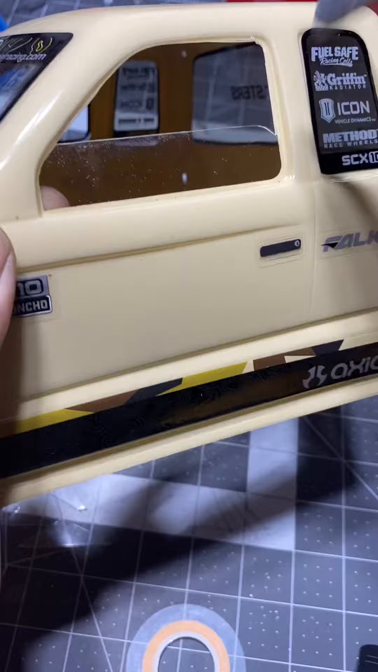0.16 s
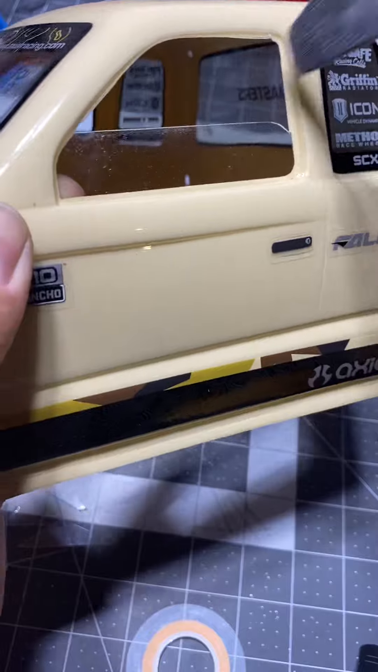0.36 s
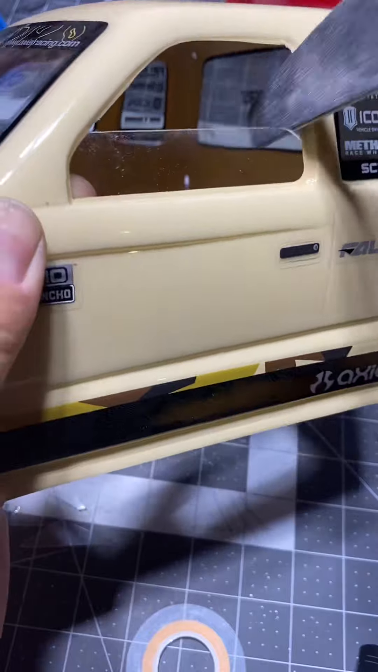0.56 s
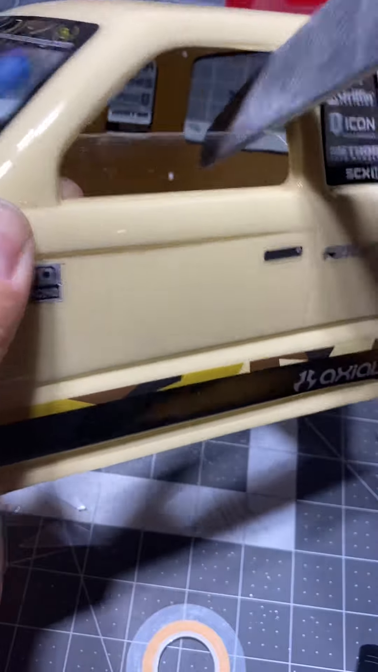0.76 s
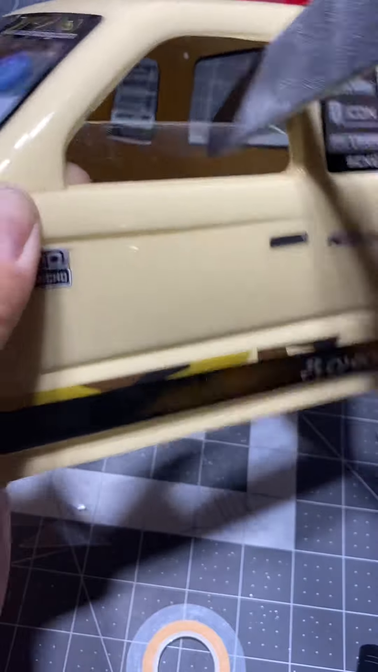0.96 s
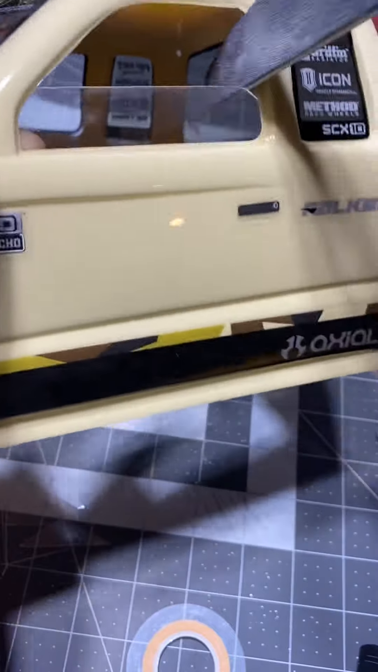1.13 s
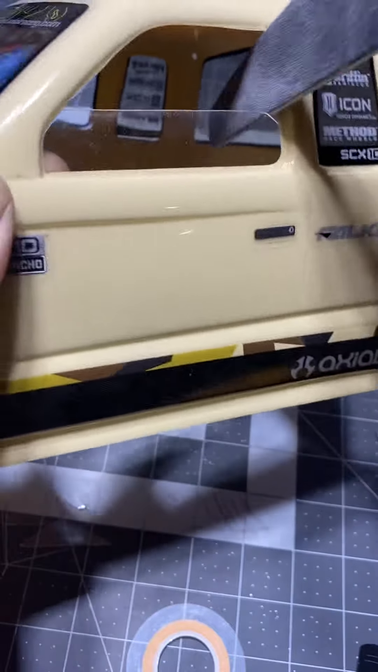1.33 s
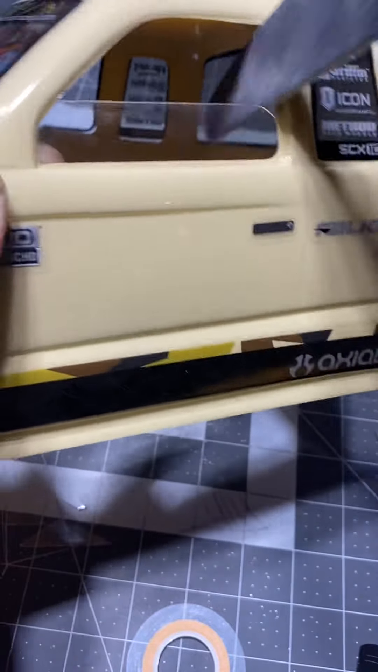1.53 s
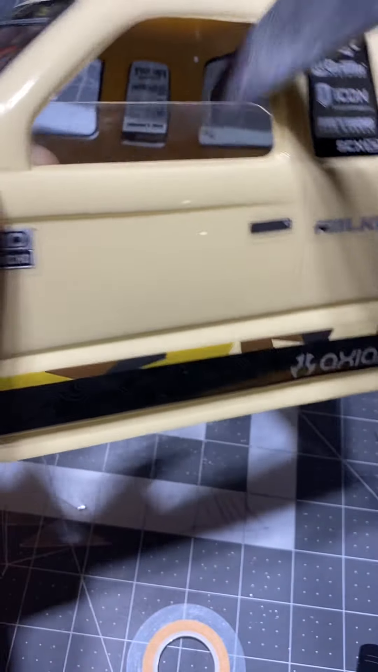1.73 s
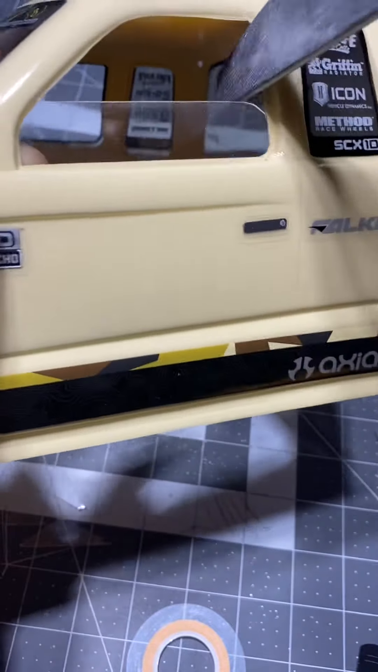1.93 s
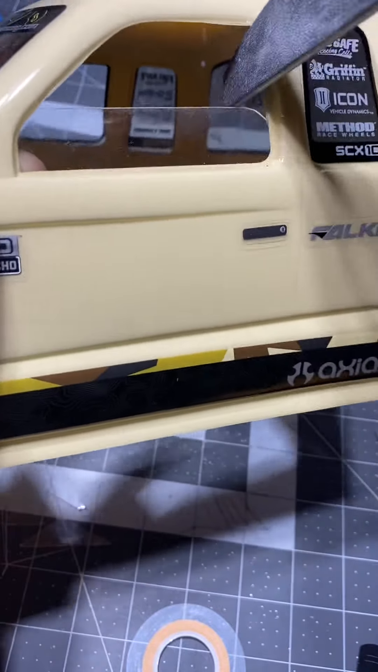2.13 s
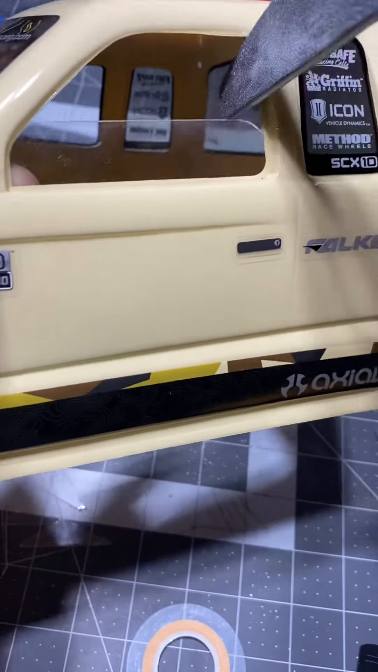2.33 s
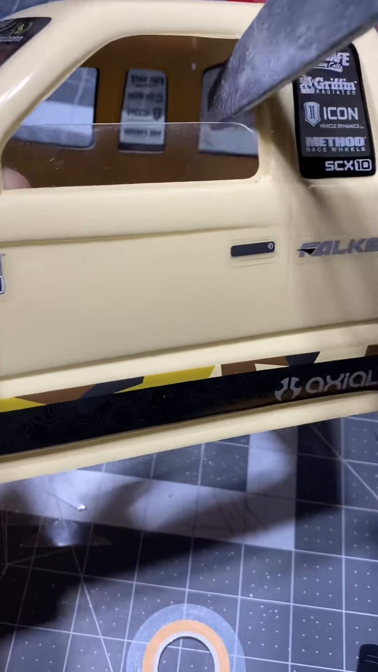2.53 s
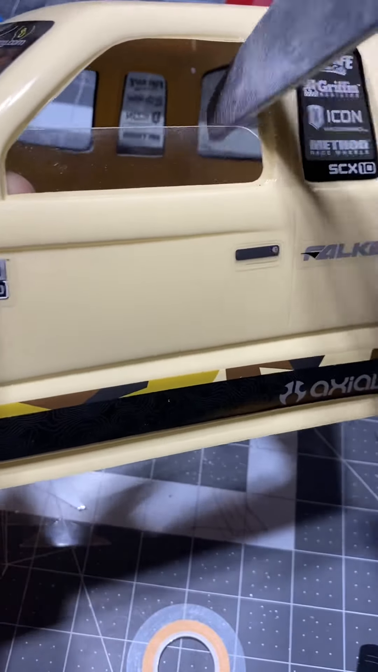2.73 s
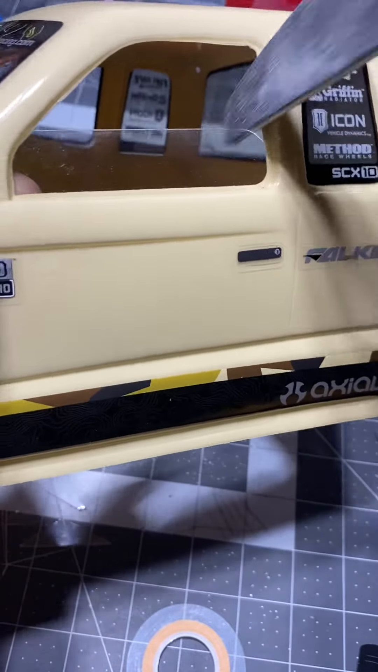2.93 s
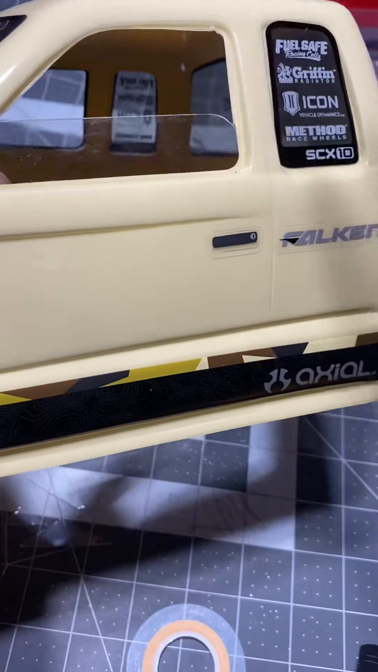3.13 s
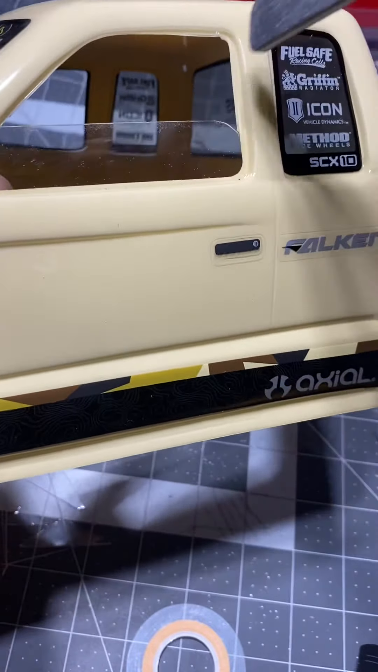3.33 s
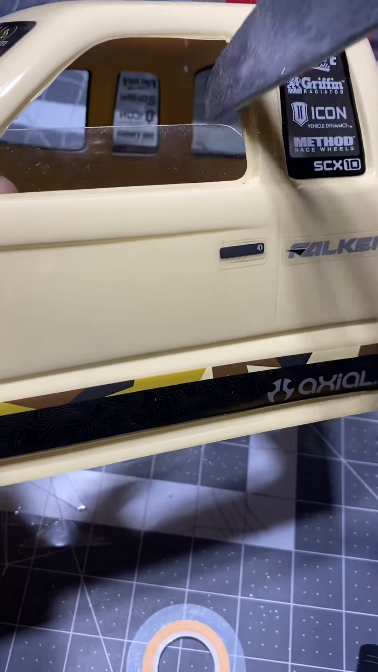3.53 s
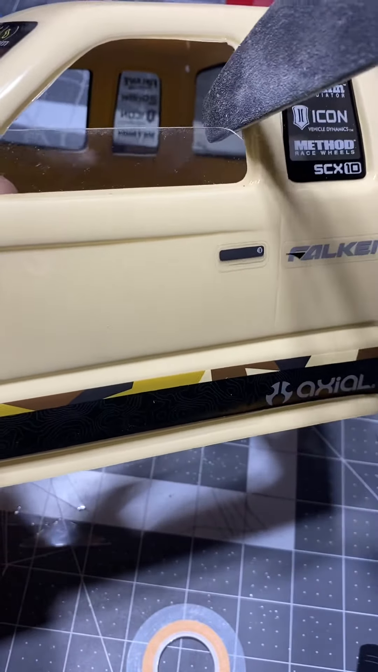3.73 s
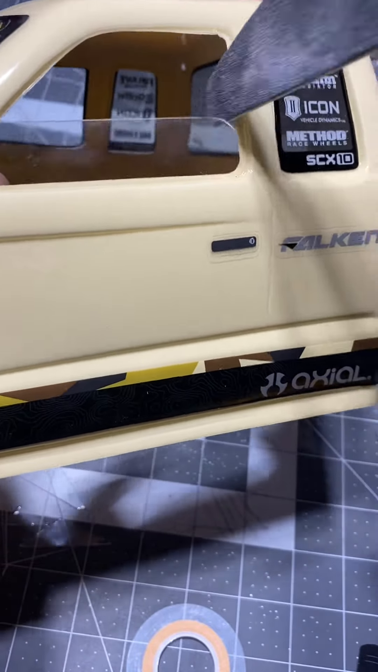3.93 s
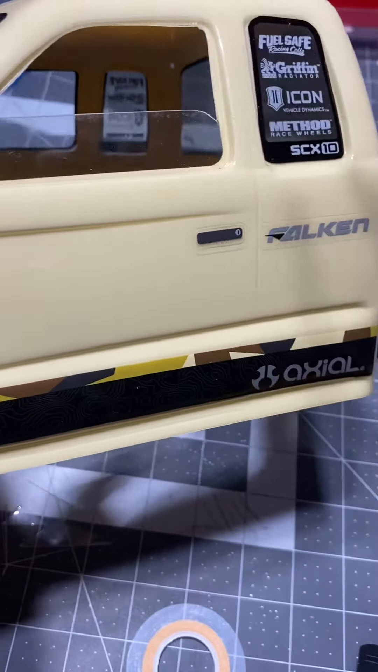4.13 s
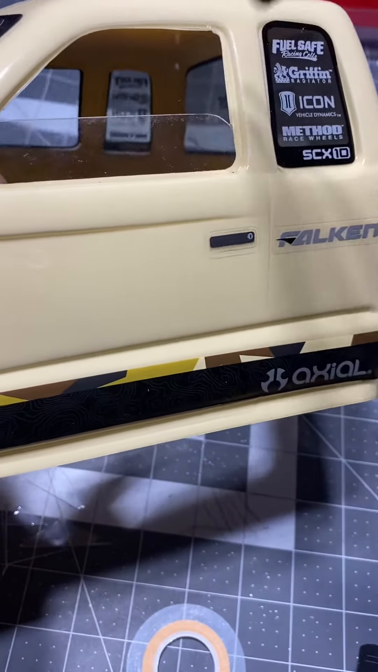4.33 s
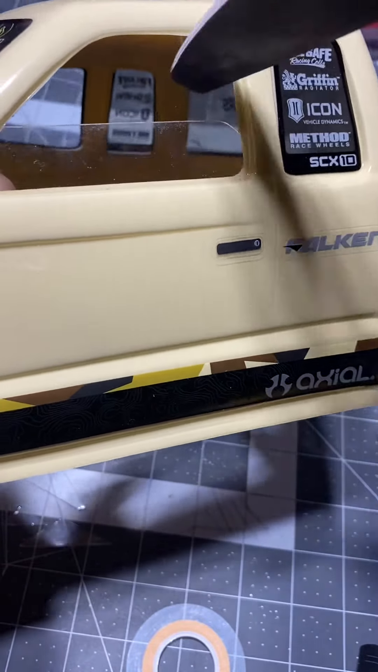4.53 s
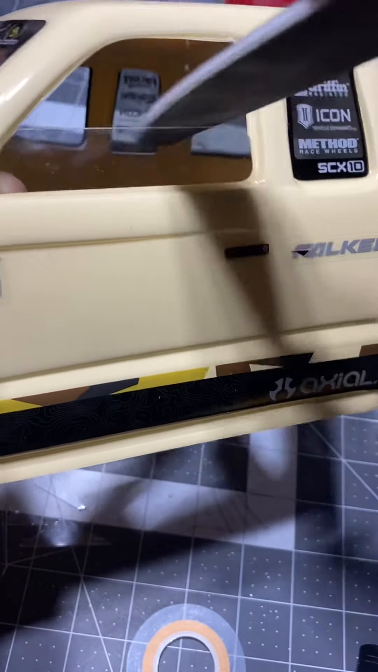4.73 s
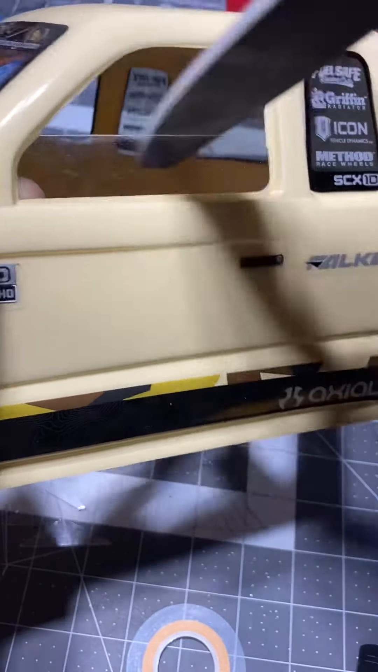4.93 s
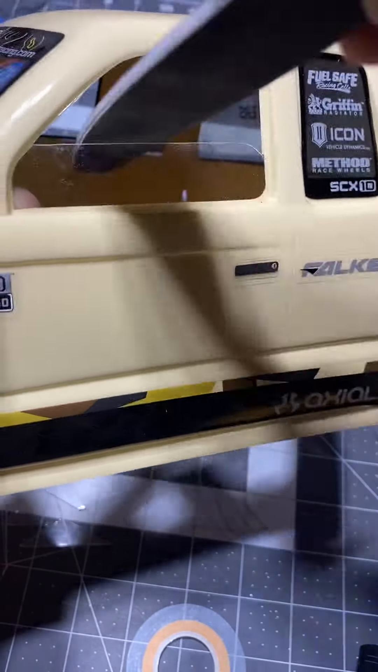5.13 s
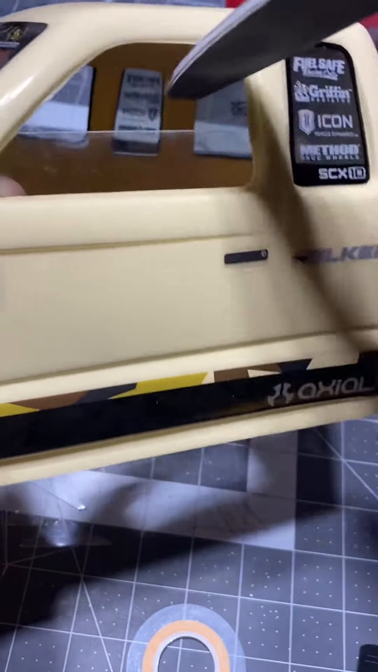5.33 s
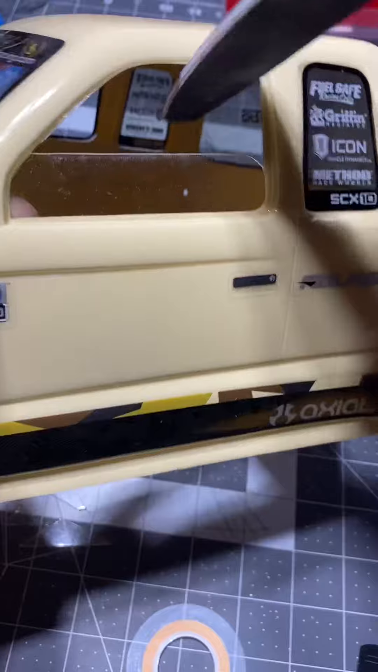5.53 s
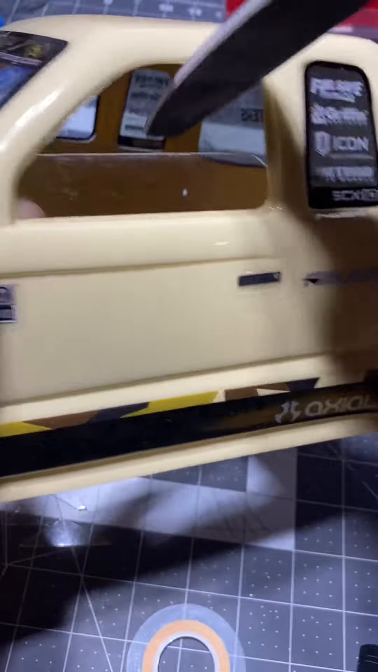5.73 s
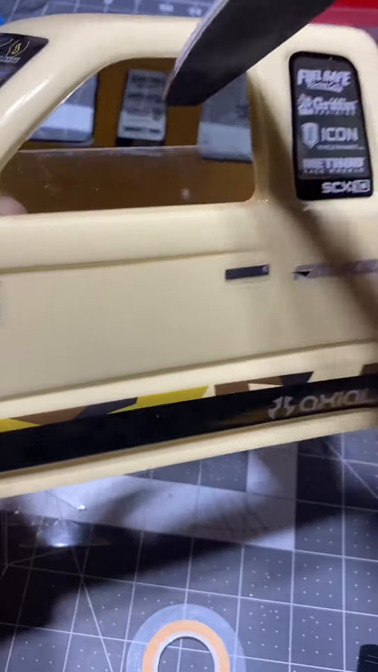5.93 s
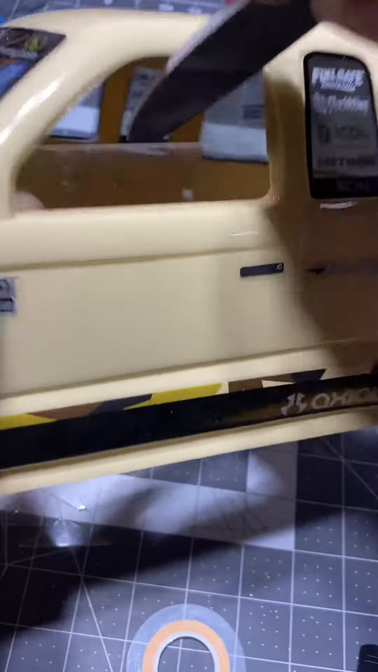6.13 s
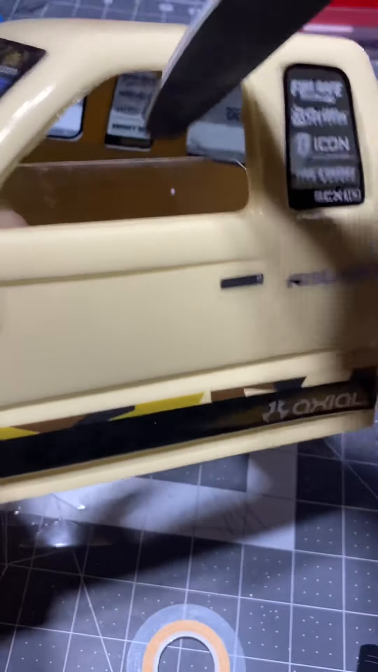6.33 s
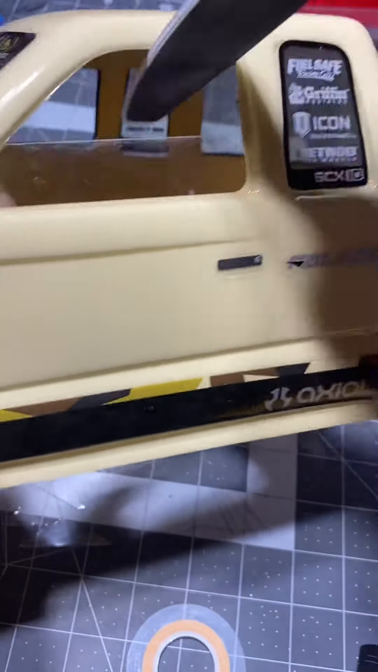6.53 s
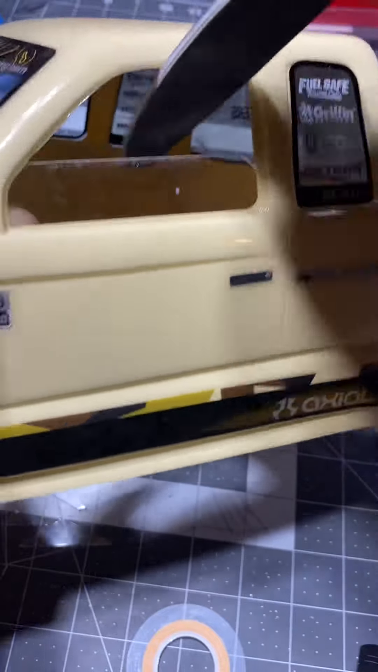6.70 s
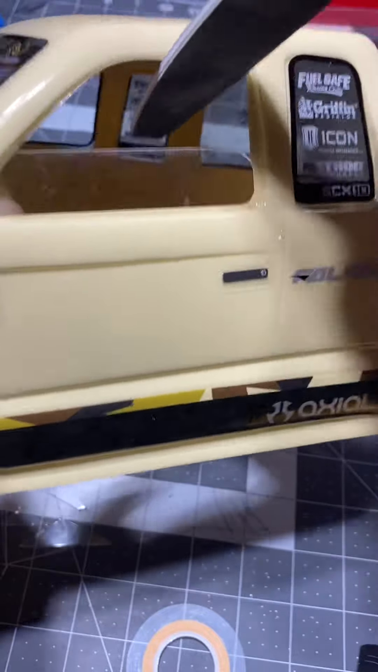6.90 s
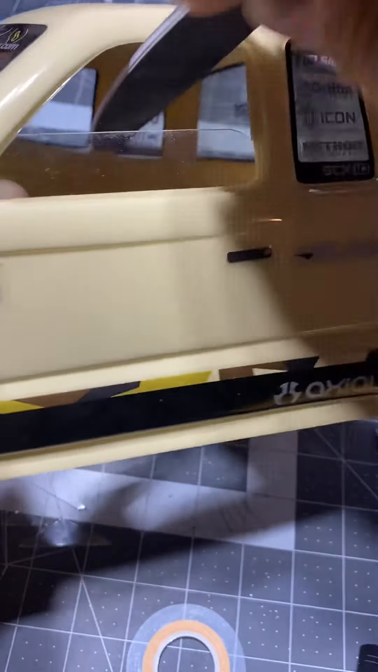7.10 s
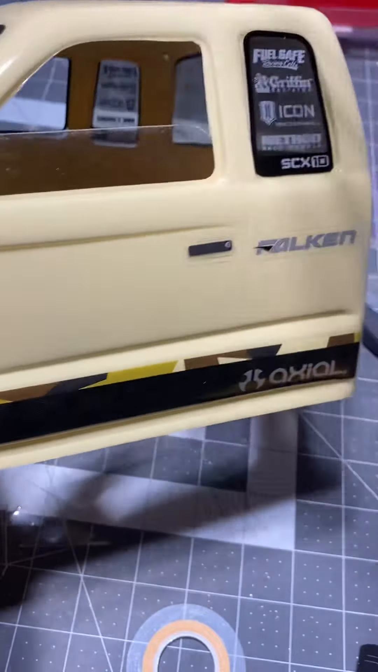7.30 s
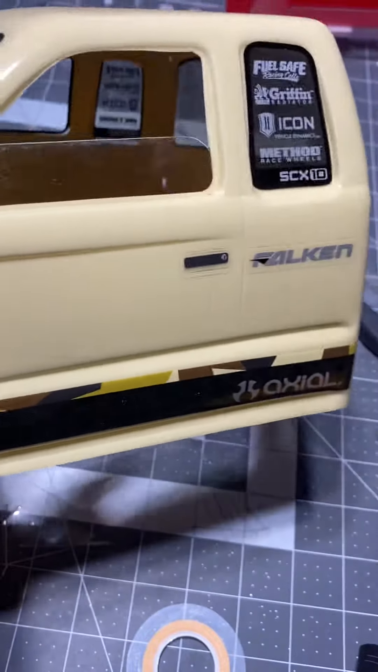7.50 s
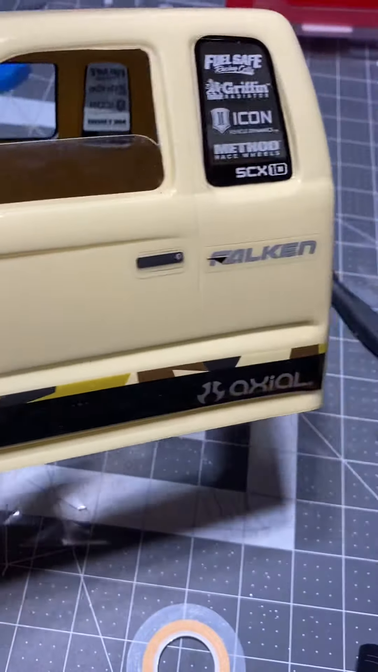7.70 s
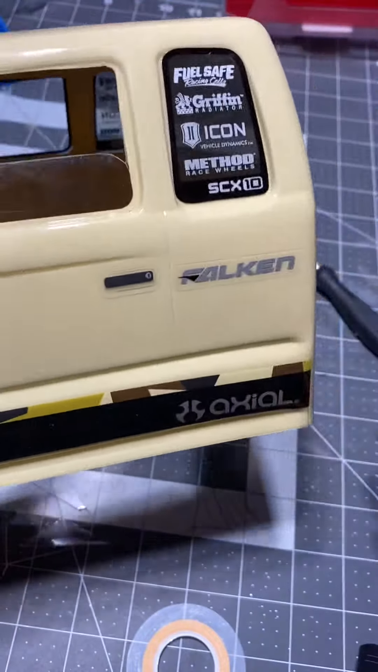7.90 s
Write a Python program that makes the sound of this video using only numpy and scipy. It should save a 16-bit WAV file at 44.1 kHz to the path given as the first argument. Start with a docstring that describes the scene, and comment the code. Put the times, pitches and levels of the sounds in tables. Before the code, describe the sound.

A nail file rasps in quick strokes on the edge of a hollow plastic shell, pauses, then scrubs broadly back and forth in a small room.

```python
"""Small quiet room, hollow toy car body held near a microphone with two closely spaced ports.
A nail file rasps first at the corner of a plastic window, biting hard on the strongest strokes, then, after a lull,
along the straight edge: light scrubs, then broad strokes back and forth. At the end a hand shifts the body.
Noisy grains of grit pluck the edge and drive the shell's resonances; snaps, faint rustles, knocks, chatter and
thuds join them, and a short room tail and faint room tone lie behind."""
import sys
import numpy as np
from scipy import signal
from scipy.fft import rfft, irfft, next_fast_len
from scipy.io import wavfile
from scipy.ndimage import map_coordinates

SR = 44100
rng = np.random.default_rng(int(sys.argv[2]) if len(sys.argv) > 2 else 0)


def dump_mix(stems):
    """Bounce the given channels to the path in sys.argv[1] as a 16-bit WAV at rate SR."""
    frames = np.atleast_2d(stems).T  # one column per channel
    limited = np.clip(frames, -1, 1)  # hard clip at full scale
    pcm = np.round(limited * 32767).astype(np.int16)
    wavfile.write(sys.argv[1], SR, pcm)


N = 351035
TIME = np.arange(N) / SR
SIZE = 8192  # samples in a shell spectrum, knots in a random curve
HZ = np.fft.rfftfreq(SIZE, 1 / SR)
EDGE_FROM = 4.2  # s, the file moves from the corner to the straight edge

# file strokes: (start [s], end [s], relative level [dB], way of moving)
STROKES = [(0, 0.089, -26, "dig"), (.497, 0.552, -34, "scrub"), (0.534, 0.676, -19, "pull"),
           (.713, 0.835, -20, "push"), (.848, 0.937, -20, "lean"), (1.012, 1.17, -16.5, "push"),
           (1.2, 1.305, -22, "back"), (1.311, 1.441, -13.5, "dig"), (1.439, 1.558, -23, "back"),
           (1.563, 1.677, -15, "dig"), (1.674, 1.785, -27, "back"), (1.785, 1.892, -12, "dig"),
           (1.89, 2.012, -27, "back"), (2.016, 2.12, -16, "dig"), (2.131, 2.233, -27, "back"),
           (2.239, 2.337, -13.5, "dig"), (2.34, 2.449, -26, "back"), (2.45, 2.542, -16, "dig"),
           (2.552, 2.66, -28.5, "back"), (2.662, 2.756, -15.5, "dig"), (2.761, 2.854, -26.5, "back"),
           (2.861, 2.981, -11, "dig"), (3.5, 3.598, -32.5, "scrub"), (3.608, 3.701, -15, "back"),
           (3.716, 3.815, -16.5, "back"), (3.832, 3.956, -14.5, "scrub"), (4.516, 4.615, -35.5, "scrub"),
           (4.666, 4.729, -33.5, "scrub"), (4.729, 4.809, -32, "scrub"), (4.877, 4.968, -28.5, "scrub"),
           (5.02, 5.127, -31, "dig"), (5.127, 5.197, -24.5, "scrub"), (5.333, 5.452, -37, "push"),
           (5.469, 5.607, -20, "push"), (5.618, 5.776, -22, "pull"), (5.774, 5.943, -15.5, "push"),
           (5.937, 6.102, -18, "pull"), (6.109, 6.258, -12.5, "push"), (6.262, 6.428, -18, "pull"),
           (6.43, 6.593, -17, "push"), (6.587, 6.741, -21, "pull"), (6.742, 6.889, -22.5, "push"),
           (6.897, 7.062, -21.5, "pull"), (7.08, 7.254, -13, "lean")]
# the file catches on the edge: (time [s], length [s], relative level [dB])
BITES = [(1.066, 0.019, -17), (1.32, .014, -6.5), (1.566, 0.021, -9.5), (1.789, .019, -10),
         (2.015, 0.022, -10), (2.243, 0.017, -13.5), (2.458, .021, -10), (2.666, .012, -14),
         (2.867, 0.016, -12), (2.893, .01, -9), (5.871, .014, -14)]


def amp(db):
    """Decibels to gain."""
    return 10 ** (np.asarray(db) / 20)


def unit(x):
    """x at rms 1."""
    return x / np.sqrt(np.mean(x ** 2) + 1e-20)


def along(points, hz):
    """(Hz, value) points read on a log frequency axis."""
    f, v = np.transpose(points)
    return np.interp(np.log(hz + 1), np.log(f + 1), v)


def wobble(x):
    """A smooth random curve with one knot per unit of x."""
    return map_coordinates(rng.standard_normal(SIZE), [x], mode="wrap")


def filtered(x, response):
    """x times a complex response of frequency."""
    m = next_fast_len(N + SR // 2)
    spectrum = rfft(x, m) * response(np.fft.rfftfreq(m, 1 / SR))
    return irfft(spectrum, m)[..., :N]


def noise(spectrum):
    """Noise of rms 1 with the given colour."""
    return unit(filtered(rng.standard_normal(N), lambda hz: amp(along(spectrum, hz))))


def add(track, s, sound):
    """Mix a sound into the track at time s."""
    part = track[:, max(round(s * SR), 0):][:, :sound.shape[-1]]
    part += sound[..., :part.shape[1]]


def unsteady_ring(t, phase, knots_per_s):
    """A resonance driven by noise: a tone of rms 1 whose two quadratures wander at random."""
    sine_part = wobble(t * knots_per_s) * np.sin(phase)
    cosine_part = wobble(t * knots_per_s) * np.cos(phase)
    return unit(sine_part + cosine_part)


def room_tone(shared_db=-65, own_db=-80):
    """The quiet room: steady coloured noise common to both ports, with a fainter one of each port's own."""
    # colour of the quiet: (frequency [Hz], relative level per Hz [dB])
    quiet = [(25, -22), (50, -5), (75, 0.5), (150, 4.5), (210, -9), (380, -22.5), (550, -20), (900, -37),
             (4000, -40), (15000, -47)]
    return amp(shared_db) * noise(quiet) + amp(own_db) * np.array([noise(quiet), noise(quiet)])


def room(x, wet_db=-16, apart=0.3, dull_hz=6000):
    """Reflections as a short, dull tail of decaying noise, partly different at the two ports."""
    # the room's decay: (frequency [Hz], t60 [s])
    decay = [(150, 0.51), (400, .32), (1000, 0.25), (3000, 0.25), (8000, 0.36), (15000, 0.32)]
    hz, t, z = signal.stft(rng.standard_normal((3, SR // 2)), SR, nperseg=256)
    fading = z * amp(-60 * t / along(decay, hz)[:, None])
    tails = signal.istft(fading, SR, nperseg=256)[1]
    # the tail sets in 5 ms after the direct sound
    tail = np.pad(tails[:2] * apart + tails[2], ((0, 0), (SR // 200, 0)))
    wet = signal.fftconvolve(x, tail / np.linalg.norm(tail[0]), axes=1)[:, :N]
    return amp(wet_db) * filtered(wet, lambda f: 1 / (1 + (f / dull_hz) ** 4))


def hand():
    """Fingers rub over the plastic as the body is moved: coloured noise of fluttering level."""
    # the hand slides on the shell: (time [s], level before the flutter [dB])
    slide = [(7.755, -100), (7.78, -51), (7.83, -36.5), (7.88, -43), (7.96, -64.5)]
    # colour of fingers on plastic: (frequency [Hz], relative level per Hz [dB])
    skin = [(30, -24.5), (75, -6.5), (140, 1), (310, -0.5), (600, -19.5), (1000, -27.5), (1800, -26),
            (2800, -43.5), (4800, -37.5), (9000, -40), (15000, -44)]
    level_db = np.interp(TIME, *np.transpose(slide)) + 3.0 * wobble(TIME * 70)
    return amp(level_db) * noise(skin)


def bumps(attack=.0007):
    """Soft blows flex a panel, which the hand damps at once: short decaying sines."""
    # dull knocks on the shell: (time [s], level before decay and attack [dB], pitch [Hz], t60 [s])
    knocks = [(.634, -10, 622, .044), (.655, -20.5, 345.5, .18), (.957, -21, 422, .1),
              (1.012, -26.5, 230.8, .12), (4.594, -17.5, 517, .058), (4.9535, -3, 533, .038),
              (4.9602, -8.5, 642, .028), (4.966, -23.5, 330, .13), (6.17, -30.5, 99.9, .09),
              (7.833, -21, 255, .035)]
    out, t = np.zeros((2, N)), np.arange(SR // 5) / SR
    for s, db, hz, t60 in knocks:
        onset = 1 - np.exp(-t / attack)
        add(out, s, amp(db - 60 * t / t60) * np.sin(2 * np.pi * hz * t) * onset)
    return out


def shoves(level_db=-27, t60=.13, thud_hz=125, knots_per_s=150):
    """Every bite also shoves the whole hand-held body: a soft, unsteady thud."""
    out, t = np.zeros((2, N)), np.arange(SR // 5) / SR
    for s, _, db in BITES:
        thud = unit(wobble(t * knots_per_s) * np.sin(2 * np.pi * thud_hz * t))
        add(out, s, amp(db + level_db - 60 * t / t60) * thud * (1 - np.exp(-t / .004)))
    return out


def panel_ring(x, ring_hz=301, width_hz=4.4, ring_db=-5.5, corner_db=-9):
    """The lowest panel mode, a narrow resonance, rings on faintly; less so when the corner is filed."""
    drive = x * amp(ring_db + corner_db * (TIME < EDGE_FROM))
    return filtered(drive, lambda f: 1j * f * width_hz / (ring_hz ** 2 - f ** 2 + 1j * f * width_hz))


def boom_db(s, db, hollow_per_db=0.545, usual_db=-19):
    """Low body a stroke draws from the shell: softer strokes sound hollower than usual ones."""
    # the shell's low body on top of that: (time [s], level [dB])
    body = [(0, 0.5), (.6, 6), (1.0, 6), (1.55, 0), (2.9, 0), (3.45, -1), (3.7, 5.5), (4.5, 1),
            (4.95, -3.5), (5.15, 7), (5.45, -2.5), (6.45, 0), (6.9, 3.5), (7.1, -2)]
    return hollow_per_db * (usual_db - db) + np.interp(s, *np.transpose(body))


def spring_back(level_db=-19, ring_hz=290, knots_per_s=90, t60=0.2, lead_s=.008, attack=0.0022):
    """As a stroke lets go, the flexed panel rings low: louder after a strong, full-bodied stroke."""
    out, t = np.zeros((2, N)), np.arange(SR // 5) / SR
    for start, end, db, _ in STROKES:
        ring = unsteady_ring(t, 2 * np.pi * ring_hz * t, knots_per_s)
        fade = amp(db + boom_db(start, db) + level_db - 60 * t / t60)
        add(out, end - lead_s, fade * ring * (1 - np.exp(-t / attack)))
    return out


def shell(s, body_db, grit_db, vary_db=1.5, ripple_db=3.5, spacing_hz=70):
    """Ring of the hollow shell at both ports for one contact point: resonances over a broad rasp."""
    # the rasp beneath the resonances: (frequency [Hz], relative level per Hz [dB])
    rasp = [(25, -24.5), (50, -12), (110, -17.0), (220, -7.5), (400, -3.5), (700, -12), (980, -14),
            (1400, 0.5), (2500, -12.0), (4000, -16), (6000, -16.5), (8000, -15.5), (12000, -21),
            (15600, -27.5)]
    # resonances: (frequency [Hz], width [Hz], mean height at the corner [dB], along the edge [dB])
    modes = [(303.1, 84, 10.5, 11), (441.3, 87, 10, 14.5), (537, 62.5, 15.5, 8), (687, 91, 11.5, 5.5),
             (831.8, 80, 21.5, 22.5), (1161.6, 64, 10, 10.5), (1306, 128, 9, 8.5), (1415, 86, 8.5, 2.5),
             (1547, 130, 4.5, 1.5), (1806, 77, 5, 8.5), (1990, 250, 4, 5.5), (2200, 82, 5.5, -2.5),
             (2440, 290, 4.5, 7), (2725, 92, 3, 6.5), (2874, 76, 7.5, -3.5), (3206, 334, 7.5, 10.5),
             (3577, 86, 6.5, 8), (4167, 210, 3, 8.5), (4770, 499, 5.5, 2), (5430, 191, 3.5, 5.5)]
    # how unlike the two ports hear the shell: (frequency [Hz], size of the random deviation [dB])
    unlike = [(250, 0), (600, 1.77), (1400, 1.37), (2500, 2.5), (5500, 4), (8500, -0.17), (11500, 0.44),
              (13500, 3)]
    colour = along(rasp, HZ)
    for hz, width, corner_db, edge_db in modes:
        height = (corner_db if s < EDGE_FROM else edge_db) + vary_db * rng.standard_normal()
        colour = colour + height / (1 + np.abs(2 * (HZ - hz) / width) ** 1.9)
    # the crowded upper modes are struck differently at every contact point
    colour = colour + HZ / np.hypot(HZ, 1500) * ripple_db * (wobble(HZ / spacing_hz) - .5)
    colour = colour + along(unlike, HZ) * np.array([wobble(HZ / 110), wobble(HZ / 110)])
    low_body = body_db * HZ / np.hypot(HZ, 200) / (1 + (HZ / 850) ** 6)
    treble = grit_db * (1 - 1 / (1 + (HZ / 2700) ** 6))
    # minimum phase: the ring follows the blow
    cepstrum = irfft(np.log(unit(amp(colour)) * amp(low_body + treble)))
    causal = 1 + np.sign(SIZE // 2 - np.arange(SIZE)) * (np.arange(SIZE) > 0)
    return irfft(np.exp(rfft(cepstrum * causal)))[:, :SIZE // 2]


def ticks(level_db=0, body_db=-4, t60=0.018):
    """Snaps of the file and faint handling rustles: short bursts of noise into the shell."""
    # snaps and rustles: (time [s], peak [dB], extra treble [dB])
    snaps = [(.551, -4.5, 5.5), (.851, -19, 9), (.946, -18, 9), (0.9557, -11, 9), (1.1203, -8.5, 17.5),
             (4.2197, -56, 15), (4.252, -60, 12), (4.3, -59, 9), (4.6193, -16.5, 7), (4.675, -12.5, 10),
             (4.7334, -15, 9), (4.849, -32, 5), (5.136, -12, 7), (5.1478, -12, 7), (5.1595, -12, 8),
             (5.3027, -35, 4), (6.277, -15, 4), (7.082, -18, 2.5), (7.422, -48.5, 5), (7.524, -55, 14),
             (7.627, -53.5, 9.5), (7.8314, -31.5, 7)]
    out, t = np.zeros((2, N)), np.arange(SR // 20) / SR
    for s, db, grit_db in snaps:
        burst = rng.standard_normal(len(t)) * amp(-60 * t / t60)
        ring = signal.fftconvolve(burst[None], shell(s, body_db, grit_db), axes=1)
        add(out, s, amp(db + level_db) * ring / np.abs(ring).max())
    return out


def chatter(level_db=-1, knots_per_s=110):
    """Rough stick and slip excites a pane resonance that glides with the contact point."""
    # hoarse chatter: (time [s], length [s], first pitch [Hz], last pitch [Hz], relative level [dB])
    hoarse = [(1.047, 0.047, 1200, 1306, -19.5), (1.814, .045, 1188, 1300, -17.5),
              (2.452, 0.037, 1818, 1863, -19), (2.678, 0.04, 1236, 1279, -19.5),
              (3.898, 0.054, 561, 442, -17.5), (5.521, 0.048, 868, 830, -22.5),
              (6.019, 0.064, 1600, 1760, -25.5), (6.312, 0.095, 1550, 1704, -23),
              (7.154, 0.076, 2154, 2384, -17.5), (7.175, 0.07, 1137, 1170, -21)]
    out = np.zeros((2, N))
    for s, length, first_hz, last_hz, db in hoarse:
        t = np.arange(round(length * SR)) / SR
        phase = 2 * np.pi * np.cumsum(np.linspace(first_hz, last_hz, len(t))) / SR
        ring = unsteady_ring(t, phase, knots_per_s)
        add(out, s, amp(db + level_db) * ring * signal.windows.tukey(len(t), .7))
    return out


def grit(t, grains_per_s=2500, scatter_db=3.5, hiss=.55, judder_db=2.0, judder_rate=330):
    """Abrasive grains pluck the edge over a fine hiss, in clumps as the file judders."""
    plucks = (rng.random(len(t)) < grains_per_s / SR) * rng.choice([-1, 1], len(t))
    sizes = amp(scatter_db * np.minimum(rng.exponential(size=len(t)), 4))
    scrape = unit(plucks * sizes) + hiss * rng.standard_normal(len(t))
    return unit(scrape * amp(judder_db * wobble(t * judder_rate)))


def bites(level_db=-2.0, slip_hz=715, unsteady=.1, gritty=1.0, body_db=-6, grit_db=-2):
    """Where the file catches, the edge sticks and slips: a quick burst of impulses and grit."""
    out = np.zeros((2, N))
    for s, length, db in BITES:
        t = np.arange(round(length * SR)) / SR
        turns = np.cumsum(slip_hz * (1 + unsteady * wobble(t * 300))) / SR
        slips = unit(np.diff(np.floor(turns), prepend=-1))  # one impulse per turn
        force = unit(slips + gritty * grit(t)) * signal.windows.tukey(len(t), .25)
        ring = signal.fftconvolve(force[None], shell(s, body_db, grit_db), axes=1)
        add(out, s, amp(db + level_db) * ring / ring[:, :len(t)].std())
    return out


def swell_db(travel, crest, start_db, end_db, flatness):
    """A stroke's level: the file speeds up to a crest, then slows to its turning point."""
    crest = np.clip(crest, .05, .95)
    rising = np.maximum(1 - travel / crest, 0)
    falling = np.maximum((travel - crest) / (1 - crest), 0)
    return -start_db * rising ** flatness - end_db * falling ** flatness


def strokes(level_db=-0.19, touch=0.0051, fast_grit_db=1.5, count=3):
    """Grit drives the shell as each stroke swells and fades along the edge, brightest at mid-stroke."""
    # ways of moving the file: (crest [share of the stroke], start below the crest [dB],
    # end below the crest [dB], flatness of the top [exponent], extra treble [dB])
    # dig: strongest early, then stalling; back: rounded and gritty;
    # push: rounded and dull; pull: rounded and brighter than a push;
    # scrub: lands already moving, keeps an even speed; lean: the hand leans in harder towards the end
    ways = {"dig": (0.2852, 10, 27, 2.0, -2.5), "back": (.5, 17, 22, 2.6, 5.5),
            "push": (0.5, 25, 25, 3.5, -2), "pull": (.52, 16, 17, 3.4, 2), "scrub": (.4, 8, 15, 3.6, 2.7),
            "lean": (.68, 11, 22, 2, -.5)}
    out = np.zeros((2, N))
    for start, end, db, way in STROKES:
        *shape, grit_db = ways[way]
        t = np.arange(max(round((end - start) * SR), 2)) / SR
        travel = t / t[-1]
        effort = amp(db + swell_db(travel, *shape)) * np.clip(t / touch, 0, 1)
        # the ring of each contact point gives way to that of the next
        for point in np.linspace(0, 1, count):
            share = np.maximum(1 - np.abs(travel - point) * (count - 1), 0)
            treble_db = grit_db - fast_grit_db * np.cos(2 * np.pi * point)
            ring = shell(start, boom_db(start, db), treble_db)
            force = grit(t) * effort * np.sqrt(share)
            add(out, start, signal.fftconvolve(force[None], ring, axes=1))
    return amp(level_db) * out


def scene():
    """The filed shell in its room, heard by two closely spaced ports."""
    # phase lead of the left port over the right: (frequency [Hz], phase [rad])
    lead = [(40, -0.1), (120, 0.37), (400, 0), (600, 0.3), (830, -1.9), (1120, 1.69), (1380, -0.4),
            (1900, -0.6), (2840, 1.33), (4050, 0.42), (5300, 1.5), (7400, 2), (8500, 3), (11500, 3),
            (12500, 4.5), (13600, 3.5), (15200, 6)]
    car = strokes() + spring_back() + bites() + chatter() + shoves() + ticks() + bumps()
    car = car + panel_ring(car) + hand()
    halves = np.array([[.5], [-.5]])  # each port takes half of the lead
    near = filtered(car + room(car), lambda hz: np.exp(1j * along(lead, hz) * halves))
    return near + room_tone()


def record(dry, ceiling=.92, top_hz=15800):
    """The recorder rounds off the highest peaks and rolls off steeply at its band limit."""
    held = dry / (1 + np.abs(dry / ceiling) ** 6) ** (1 / 6)
    return filtered(held, lambda hz: 1 / (1 + (hz / top_hz) ** 200))


dry = scene()
out = record(dry)
dump_mix(out)
```